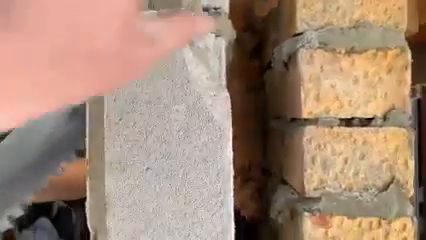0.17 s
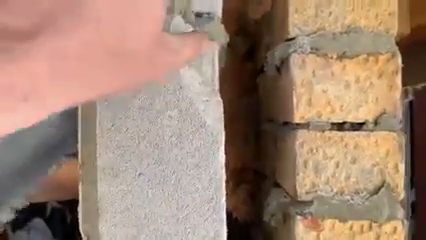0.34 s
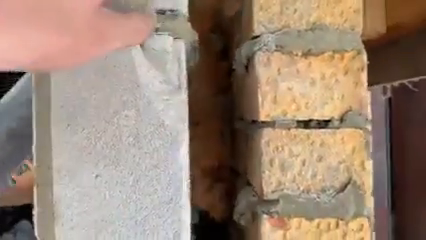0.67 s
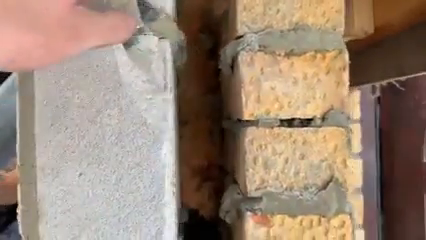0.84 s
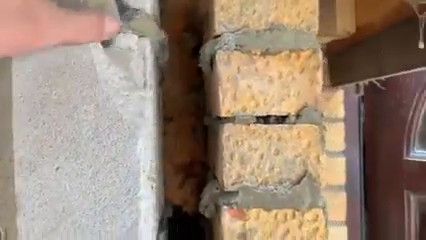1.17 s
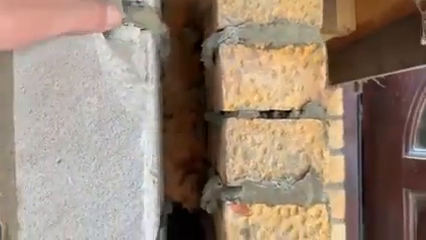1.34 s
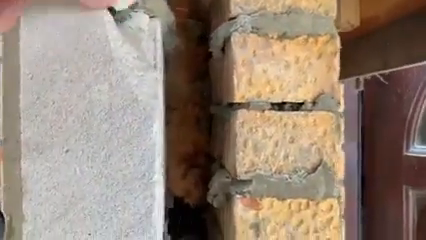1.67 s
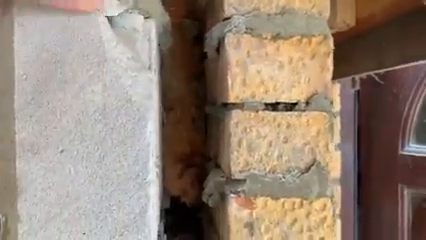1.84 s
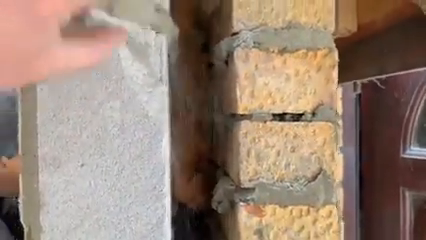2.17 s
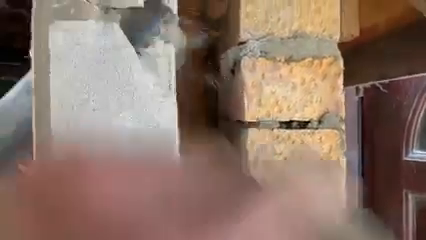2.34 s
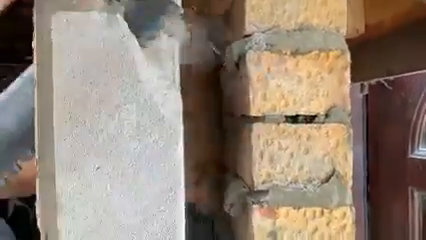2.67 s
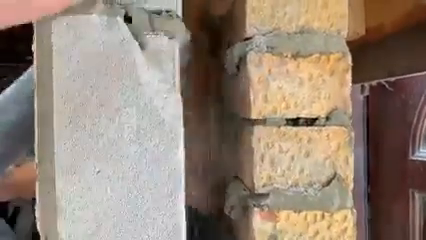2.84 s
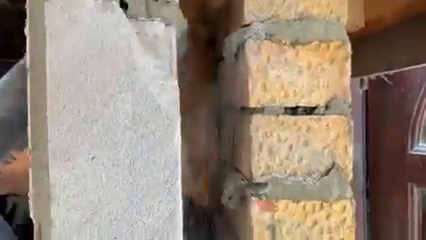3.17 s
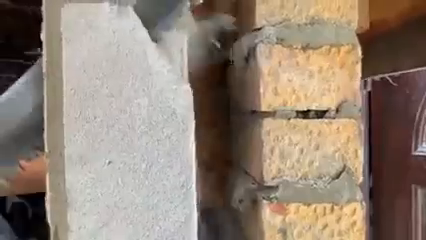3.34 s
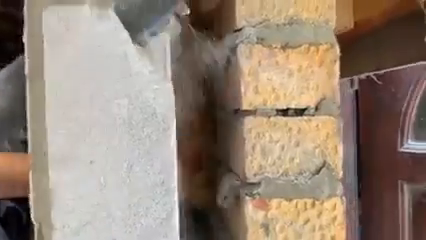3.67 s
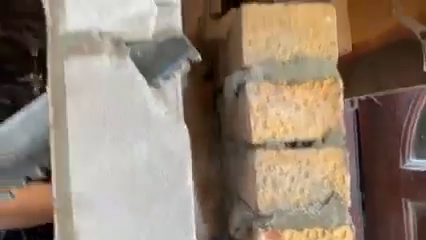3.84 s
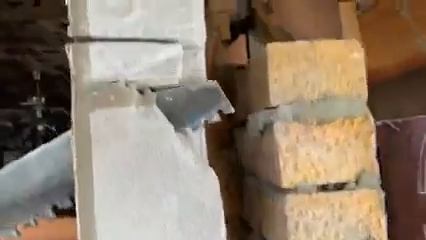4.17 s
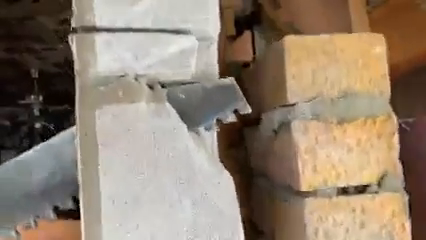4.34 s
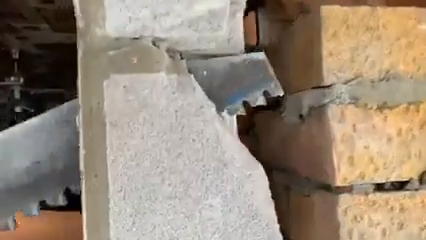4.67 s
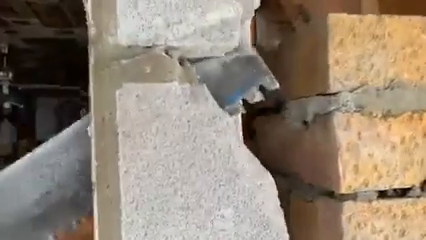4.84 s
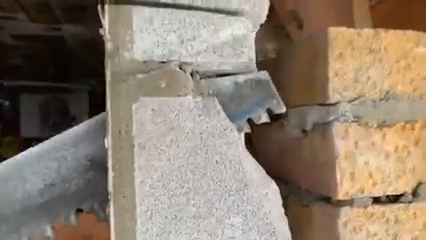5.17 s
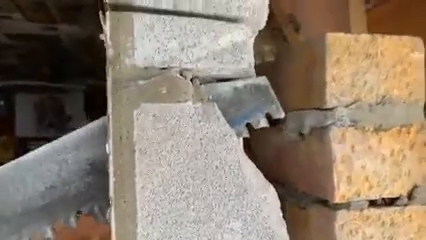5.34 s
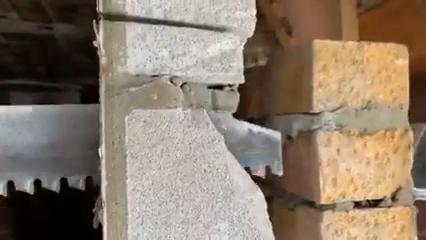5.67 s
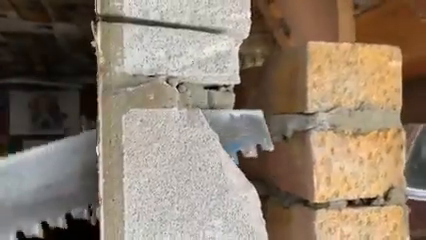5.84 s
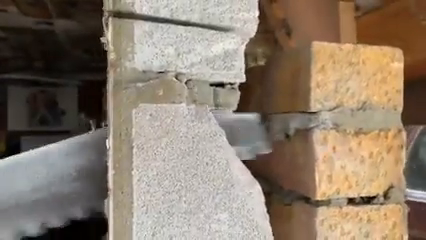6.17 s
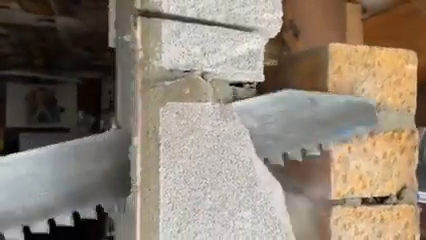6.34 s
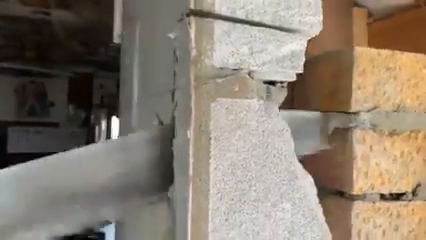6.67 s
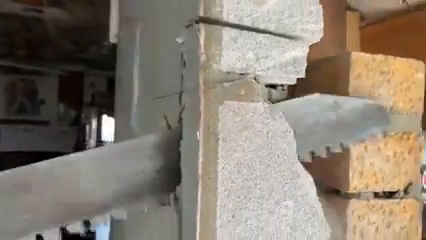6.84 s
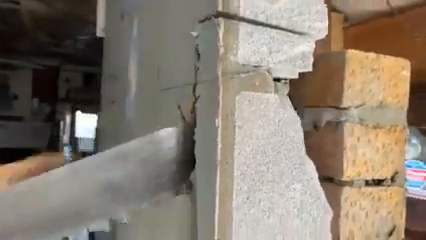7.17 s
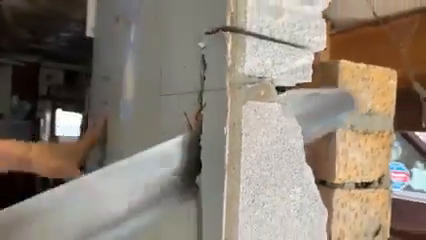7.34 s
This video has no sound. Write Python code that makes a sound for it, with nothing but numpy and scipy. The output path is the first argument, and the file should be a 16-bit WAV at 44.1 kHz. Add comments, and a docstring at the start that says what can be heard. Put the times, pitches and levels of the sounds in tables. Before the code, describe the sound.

Very close to the microphone, a coarse hand saw cuts an aerated concrete block: about a dozen brisk, gritty pushes, each ending in a low thud of the wall, with softer return scrapes between. The cutting nearly stops, with small scuffs and a snag, then longer rasping strokes resume with a singing blade. Crumbs tick, and a machine hums and whines steadily behind at a building site.

```python
"""A coarse hand saw rasps in an aerated concrete block, close by: quick pushes, each ending in a thud of the
wall, then the saw is eased round and longer strokes follow. Grit is clumped random grains, coloured and shaped
by each move. It feeds narrow resonances and the ringing steel; thin high tones flicker with the strokes. Thuds,
knocks and crumbs are decaying modes and noise bursts. Behind, a machine hums and whines at changing level: two
sines locked to one shaft, over filtered noise. A faint steady high whistle sounds throughout."""
import sys
import numpy as np
from scipy import signal
from scipy.fft import rfft, irfft
from scipy.io import wavfile
from scipy.ndimage import map_coordinates

SR = 44100
rng = np.random.default_rng(int(sys.argv[2]) if len(sys.argv) > 2 else 0)


def transcribe(signal):
    """Save signal, clipped to [-1, 1], as a 16-bit WAV file at the path in sys.argv[1]."""
    frames = np.atleast_2d(signal).T
    limited = np.clip(frames, -1, 1)
    pcm = np.round(limited * 32767).astype(np.int16)
    wavfile.write(sys.argv[1], SR, pcm)


N = 330750
TIME = np.arange(N) / SR
CUTOFF_HZ = 16000


def saw(rasp_db, crack_db, split_hz, bending_db):
    """Breaking grit sounds from the slot and sets the steel blade ringing; thin high tones follow the strokes."""
    # A tooth cracks a hard grain. Each row: time in seconds, relative level in dB.
    cracks = [(.223, -14), (.462, -10), (.487, -2.5), (.804, -4), (1.656, 3.5), (1.977, -8), (2.282, -1),
              (2.612, -7), (2.960, 0.5), (3.074, -12.5), (3.290, -14), (4.817, -15), (4.884, -13),
              (6.303, -13), (6.760, -0.5)]
    # A tooth tip ticks on the stone, thin and bright. Each row: time in seconds, relative level in dB.
    ticks = [(.078, -12), (.843, -29), (3.074, -13), (4.275, -22), (4.410, -20), (4.418, -14),
             (4.817, -18.5), (4.876, -32), (4.885, -30)]
    # Colour of the rasp. Each row: frequency in Hz, relative density in dB per Hz.
    rasp_spectrum = [(50, 10), (100, 14.5), (300, 5), (650, -2), (1100, 0), (1550, -6.5), (2050, 1),
                     (2600, 3.5), (3300, 2), (4300, 3), (5400, -3), (6500, 0), (8200, -0.5), (12000, -1.5),
                     (14000, -7), (16000, -15)]
    # Resonances and thin tones heard with the rasp. Each row: frequency in Hz, width in Hz, relative level in dB.
    resonances = [(2620, 260, -3.5), (2879, 25, -5), (3112, 25, -4), (8193, 10, 6), (8398, 12, 1),
                  (9964, 30, -1), (11869, 10, 5)]
    # Thin, very high steady tones that sound with the strokes. Each row: frequency in Hz, width in Hz,
    # relative level in dB.
    thin_tones = [(13609, 6, 20), (14642, 6, 21), (15676, 6, 27)]
    # How freely the resonances ring. Each row: time in seconds, gain in dB.
    ring_freedom = [(0, -2.5), (2.3, 3.5), (3.6, 3.5), (5.6, 6), (6.8, 3), (7.5, 4)]
    # Level of the thin high tones. Each row: time in seconds, gain in dB.
    thin_tone_levels = [(0, 0.5), (3.6, -10), (5, -7), (6.8, -21)]
    # One blade mode sings out. Each row: time in seconds, gain in dB.
    singing = [(0, 4.5), (1.2, 3.4), (2.1, 12), (2.7, 4.4), (3.3, 11), (3.9, 2), (6.1, 1.8), (6.5, 15),
               (6.8, 7.2), (7.0, 14), (7.19, 30), (7.27, 6.9), (7.5, 6)]
    sing_hz, sing_width_hz = 2386, 18

    force, bright_db = bite(drag_db=-6.0)
    broken = from_db(rasp_db) * grit(force, peak_grains_per_s=3600, size_db=2, dust=0.32,
                                     clump_rate_hz=220, clump_db=1.5, lump_db=1.4)
    broken += from_db(crack_db) * fade(blows(cracks), t60=0.015) * rng.standard_normal(N)
    rasp = shifting(colour(broken, rasp_spectrum), patchy_db=3.0, rate_hz=14)

    # fine grit hisses, coarse grit growls
    dull = signal.sosfiltfilt(signal.butter(2, split_hz, fs=SR, output="sos"), rasp)
    tilt = from_db(bright_db)
    rasp = (dull + tilt * (rasp - dull)) / np.sqrt((1 + tilt ** 2) / 2)
    rasp += fade(blows(ticks), t60=0.017) * above(rng.standard_normal(N), hz=9500)

    ringing = sum(from_db(db) * resonate(rasp, hz, width_hz) for hz, width_hz, db in resonances)
    ringing *= from_db(in_time(ring_freedom)[0])
    ringing += from_db(bending_db) * bending(rasp, reach_hz=126, width_hz=53, slide_rate_hz=11.7)
    ringing += from_db(in_time(singing)[0]) * resonate(rasp, sing_hz, sing_width_hz)
    thin = sum(from_db(db) * resonate(rasp, hz, width_hz) for hz, width_hz, db in thin_tones)
    ringing += from_db(in_time(thin_tone_levels)[0]) * thin

    reflected = moving_paths(above(rasp + ringing, hz=680), t60=0.05, sway_rate_hz=1.0, count=3)
    return ringing + wander(rasp + reflected, lag_s=.000018, rate_hz=2.7)


def bite(drag_db):
    """Cutting strength and brightness in dB: each move swells, holds and dies over a light drag."""
    # Light rubbing of the blade between bites. Each row: time in seconds, relative level in dB.
    drag = [(0, -29.5), (3.5, -38.5), (3.9, -41.5), (5.9, -38), (7.5, -34)]
    power = from_db(in_time(drag)[0] + drag_db) ** 2
    bright = np.zeros(N)
    for s, rise_s, hold_s, fall_s, db, bright_db in gestures():
        near = slice(max(int((s - 3 * rise_s) * SR), 0), int((s + hold_s + 3 * fall_s) * SR))
        dt = TIME[near] - s
        away = np.maximum(np.maximum(-dt / rise_s, (dt - hold_s) / fall_s), 0)
        swell = (from_db(db) * np.exp(-away ** 1.5)) ** 2
        power[near] += swell
        bright[near] += swell * bright_db
    return np.sqrt(power), bright / power  # brightness is weighted by power


def gestures():
    """Every cutting move as (start of hold s, rise s, hold s, fall s, relative dB, brightness dB)."""
    # Quick pushes. Each row: hardest bite in seconds, rise in seconds, hold in seconds, relative level in dB,
    # brightness in dB.
    pushes = [(0.202, 0.02, 0.017, -18, 1.5), (0.474, 0.014, 0.013, -19.5, 11),
              (0.798, 0.0048, 0.0043, -17, 6), (1.077, 0.036, 0.011, -19, 2),
              (1.357, 0.04, 0.013, -19.5, 9), (1.648, 0.0095, 0.014, -15.5, -5.5),
              (1.98, 0.006, 0.016, -22.5, -6), (2.275, 0.025, 0.0063, -18, 9),
              (2.607, 0.022, 0.022, -15.5, 5), (2.938, 0.041, 0.018, -18, 3.5),
              (3.276, 0.039, 0.02, -18.5, 1.5), (3.609, 0.05, 0.047, -22, -0.5)]
    # Even scrapes, short as the blade is pulled back or eased round, long in the last strokes.
    # Each row: start of hold in seconds, hold in seconds, relative level in dB, brightness in dB.
    scrapes = [(0.072, 0.026, -27.5, 8), (0.344, 0.027, -25.5, 6), (0.59, 0.064, -34, 30),
               (0.716, 0.02, -31, 2), (0.916, 0.013, -28.5, 5), (0.977, 0.022, -25.5, 1),
               (1.202, 0.042, -26, 7), (1.502, 0.11, -29, 8), (1.809, 0.069, -27, 4),
               (2.016, 0.04, -34, -4), (2.101, 0.11, -28, 4), (2.432, 0.1, -29, 2), (2.752, 0.055, -27, 8),
               (3.107, 0.067, -24.5, 7), (3.441, 0.056, -23.5, 5.5), (3.815, 0.05, -49, 2),
               (4.175, 0.0057, -35.5, 21), (4.399, 0.042, -33, 25), (4.663, 0.1, -37, 3),
               (5.498, 0.1, -32, -5), (5.546, 0.013, -32, -6), (5.7, 0.015, -33, -7),
               (6.023, 0.061, -31, -6), (6.191, 0.11, -28, 0), (6.417, 0.18, -26, 0),
               (6.514, 0.022, -26.5, -5), (6.704, 0.086, -24, 3), (6.751, 0.074, -19.5, -1),
               (6.957, 0.17, -25, 5), (7.233, 0.036, -24, 8), (7.288, 0.18, -17.5, 1.5)]
    # The teeth snag and tear free. Each row: time in seconds, relative level in dB, fall in seconds,
    # brightness in dB.
    snags = [(0.075, -30, 0.0087, 3), (.11, -23, 0.017, 19), (.218, -25, .01, -5), (.462, -24, 0.011, 6),
             (.632, -27, 0.014, 8), (.692, -21, 0.018, 4), (.773, -18.5, 0.0059, -3),
             (0.842, -29, 0.0085, 21), (1.272, -19, 0.01, 9), (1.621, -23, 0.0059, 6.5),
             (1.929, -18.5, 0.017, 5), (1.963, -15, 0.019, 5), (2.116, -21.5, 0.012, 7),
             (2.256, -28, .015, 2), (2.416, -22, 0.0055, 6), (2.46, -22.5, 0.043, 14),
             (2.833, -24.5, 0.016, 3), (2.896, -21.5, 0.039, -1.5), (2.992, -26, 0.012, 3),
             (3.075, -19, 0.011, 5), (3.233, -22.5, 0.018, 7), (3.458, -21, 0.021, -5),
             (4.276, -33, 0.038, 9), (4.788, -23, 0.021, -1), (4.816, -22.5, 0.0091, 1),
             (4.876, -20.5, 0.021, 1.5), (4.93, -33.5, 0.018, 7), (6.058, -29, 0.0089, -3),
             (6.296, -21.5, 0.015, -1)]
    push_stop_s = 0.016  # after its hardest bite a push stalls
    scrape_attack_s, scrape_release_s, snag_rise_s = 0.018, 0.025, .0035
    moves = [(s, rise_s, hold_s, push_stop_s, db, bright_db) for s, rise_s, hold_s, db, bright_db in pushes]
    moves += [(s, scrape_attack_s, hold_s, scrape_release_s, db, bright_db)
              for s, hold_s, db, bright_db in scrapes]
    moves += [(s, snag_rise_s, 0, fall_s, db, bright_db) for s, db, fall_s, bright_db in snags]
    return moves


def grit(force, peak_grains_per_s, size_db, dust, clump_rate_hz, clump_db, lump_db):
    """Grains break in clumps, each tooth at its own depth, more often in a hard bite, over a hiss of dust."""
    teeth_per_s, tooth_swing_db = 59, 0.5  # typical rate; each tooth digs in and slackens
    rate = peak_grains_per_s * np.sqrt(force / force.max())
    sizes = rms_one(from_db(size_db * np.minimum(rng.exponential(1, N), 4)))
    sizes = sizes * rng.choice([-1, 1], N)
    grains = sizes * (rng.random(N) < rate / SR) * np.sqrt(SR / rate)
    teeth = np.cumsum(teeth_per_s * from_db(drift(6))) / SR
    depth = rng.uniform(-1.23, 1, N)[teeth.astype(int)]
    clumps = from_db(clump_db * drift(clump_rate_hz) + lump_db * depth - tooth_swing_db * (teeth % 1))
    return force * rms_one((grains + dust * rng.standard_normal(N)) * clumps)


def bending(x, reach_hz, width_hz, slide_rate_hz, count=16):
    """Crowded bending modes trade energy; the contact favours those near one pitch, which moves with each stroke."""
    # Favoured pitch. Each row: time in seconds, frequency in Hz.
    bend_hz = [(0, 2460), (.49, 2610), (.7, 2600), (.81, 2550), (.98, 2670), (1.08, 2630), (1.27, 2800),
               (1.36, 2340), (1.6, 2470), (1.86, 2570), (2.12, 2430), (2.6, 2520), (2.93, 2430),
               (3.15, 2630), (3.3, 2400), (3.6, 2440), (6.3, 2530), (7.05, 2580), (7.5, 2680)]
    pitches_hz = np.linspace(2200, 3000, count) + 12 * rng.standard_normal(count)
    favoured_hz, = in_time(bend_hz)
    shares = np.array([drift(slide_rate_hz) / (1 + ((hz - favoured_hz) / reach_hz) ** 2) for hz in pitches_hz])
    shares /= np.sqrt(np.mean(shares ** 2, axis=0))
    return sum(resonate(x, hz, width_hz) * share for hz, share in zip(pitches_hz, shares))


def shifting(x, patchy_db, rate_hz, count=10):
    """The colour keeps changing: each band swells and sinks on its own."""
    out, rest = 0, x
    for hz in np.geomspace(1800, 12000, count):
        part = signal.sosfiltfilt(signal.butter(6, hz, fs=SR, output="sos"), rest)
        out = out + part * from_db(patchy_db * drift(rate_hz))
        rest = rest - part
    return out + rest


def moving_paths(x, t60, sway_rate_hz, count=5):
    """Short random reflections, different in each channel, trade shares over time."""
    t = TIME[:SR // 8]
    paths = rng.standard_normal((count, 2, len(t))) * from_db(-60 * t / t60) * (t > .001)
    paths /= np.sqrt(np.sum(paths ** 2, axis=2, keepdims=True))
    shares = np.array([drift(sway_rate_hz) for _ in range(count)])
    shares /= np.sqrt(np.sum(shares ** 2, axis=0))
    return sum(share * signal.oaconvolve(x[None], path, axes=1)[:, :N] for share, path in zip(shares, paths))


def wander(x, lag_s, rate_hz):
    """The sounding part of the blade moves about, so its arrival in the right channel shifts."""
    moved = np.arange(N) + lag_s * SR * drift(rate_hz)
    return np.array([x[0], map_coordinates(x[1], [moved], order=3, mode="nearest")])


def block(knock_db):
    """The blade knocks the light block, whose modes die at once."""
    # Dull knocks. Each row: time in seconds, relative level in dB.
    knocks = [(.222, -22), (.487, -13.5), (.812, -13), (1.085, -6.5), (1.655, -19), (2.284, -7),
              (2.890, -7), (3.303, -8), (6.302, -12.5)]
    # Modes of the block. Each row: frequency in Hz, relative level in dB, t60 in seconds.
    block_modes = [(520, -14, 0.021), (770, -1, 0.028), (1025, -12, 0.015), (1285, -6, 0.042),
                   (1796, -3, 0.03), (2090, -21, 0.017)]
    touches = fade(blows(knocks), t60=.012) * rng.standard_normal(N) / np.sqrt(SR / 1000)
    return sum(from_db(db + knock_db) * ring(touches, hz, t60) for hz, db, t60 in block_modes)


def wall(thud_db, rumble_db, rattle_db, spread_db):
    """The wall trembles under each push, the stalling blade's judder rings its modes and the block rocks back."""
    # A stalling push jolts the wall. Each row: time in seconds, relative thud in dB, relative deep sway in dB,
    # hardness in dB (added to all modes but the first two).
    jolts = [(.002, -34, -23.5, 0), (0.217, -19, -22, 2), (0.497, -18, -27, 1.5), (0.821, -18, -16.5, 5.5),
             (1.099, -15, -20, -2), (1.382, -16.5, -20, 2.5), (1.675, -16.5, -17, 3),
             (1.98, -22.5, -17, -1), (2.296, -14.5, -20, -9), (2.636, -20.5, -19, -1),
             (2.972, -19, -18.5, -1), (3.311, -15, -17.5, 1), (3.654, -27, -36, 7)]
    # The block shifts in its bed as the saw is turned or drags. Each row: time in seconds, relative level in dB.
    shifts = [(4.795, -18), (4.819, -23), (7.05, -24), (7.335, -29), (7.39, -28)]
    # The block rocks back on its bed. Each row: time in seconds, relative level in dB.
    rattles = [(.002, -22.5), (.225, -26), (.26, -21), (.815, -25), (.848, -23), (1.10, -27), (1.12, -28.5),
               (1.405, -22), (1.668, -25), (1.697, -20.5), (2.30, -29), (2.655, -36), (2.995, -32.5),
               (3.30, -26.5), (3.335, -25.5), (4.8, -32.5)]
    # Modes of the wall. Each row: frequency in Hz, relative level in dB, t60 in seconds.
    wall_modes = [(80, -1, 0.19), (115, -18, 0.17), (144, -1, 0.34), (159.2, -7, 0.13), (229, -12, 0.21),
                  (287, -21, 0.34), (346, -23, 0.1), (400, -20, 0.064), (456, -12, 0.073)]
    slip_s, slip_loss_db, slips = 0.0118, 2.5, 3  # mean spacing and loss from slip to slip
    lead_s, tail_s = 0.042, 0.043  # the tremble grows and dies by a factor e in these times

    s, jolt_db, sway_db, hard_db = np.transpose(jolts)
    sway = ring(blows(np.transpose([s, sway_db])), hz=50.1, t60=0.61)
    low = ring(blows(shifts), hz=91, t60=0.17) + from_db(-7) * ring(blows(shifts), hz=169, t60=0.13)

    slip_times_s = s[:, None] + slip_s * np.arange(slips) + rng.normal(0, .0005, (len(s), slips))
    for k, (hz, db, t60) in enumerate(wall_modes):
        slip_db = (jolt_db + hard_db * (k > 1))[:, None] - slip_loss_db * np.arange(slips)
        slip_db = slip_db + rng.normal(0, 1, slip_times_s.shape)
        judder = blows(np.transpose([slip_times_s.ravel(), slip_db.ravel()]))
        low = low + (-1) ** k * from_db(db + thud_db) * ring(judder, hz, t60)

    load = np.zeros(N)
    for at, db in zip(s, jolt_db):
        away = np.maximum((at - TIME) / lead_s, (TIME - at) / tail_s)
        load += from_db(db) * np.exp(-np.minimum(away, 20))
    low += from_db(rumble_db) * load * rms_one(band(rng.standard_normal(N), low_hz=63.6, high_hz=179))
    rattle = rms_one(band(rng.standard_normal(N), low_hz=158, high_hz=327))
    low += from_db(rattle_db) * fade(blows(rattles), t60=0.077) * rattle
    spread = from_db(spread_db) * moving_paths(low, t60=0.013, sway_rate_hz=1.96, count=2)
    return low + sway * from_db([[-1.3], [1.3]]) + spread


def crumbs(crumb_db, crumbs_per_s, size_db, t60, count=8):
    """Loose crumbs trickle in little runs and tick on the stone: short noise bursts through resonances."""
    falls = rng.random(N) < crumbs_per_s * from_db(5 * drift(5)) / SR
    sizes = falls * from_db(crumb_db + size_db * np.minimum(rng.exponential(1, N), 3))
    dealt, dust = rng.integers(0, count, N), rng.standard_normal(N)
    ticking = np.zeros(N)
    for k, hz in enumerate(np.geomspace(2300, 9000, count)):
        ticking += resonate(fade(sizes * (dealt == k), t60) * dust, hz, hz / 4)
    return np.array([ticking, ticking])


def machine(rush_db, diffuse_hz, diffuse_db, waver_db, whistle_db):
    """A motor hums at its shaft rate; its fan whines at the blade rate over rushing air. Apart from these, a
    faint steady high whistle sounds throughout."""
    # The two tones. Each row: time in seconds, relative hum in dB, relative whine in dB,
    # lean of the hum to the left in dB.
    tone_levels = [(0, -38.5, -51.5, -1), (2.3, -36.5, -37.5, -2), (3.0, -39, -41.5, -1),
                   (3.85, -35, -36, -4), (4.02, -34, -52, -3), (4.25, -39, -39.5, -5), (4.8, -39, -37, -3),
                   (5.03, -37, -36.5, 1), (5.35, -46, -36.5, -9), (5.8, -39.5, -41, -3),
                   (6.2, -36.5, -37, 4), (6.72, -41, -57, -10), (6.9, -41, -33, 0), (7.5, -38, -40, 0)]
    # Rush of the machine and the site. Each row: frequency in Hz, relative density in dB per Hz.
    rush_spectrum = [(30, 14), (60, -18), (92, 8), (130, 2), (220, 0), (350, 7), (480, -5), (610, 1),
                     (720, -9), (860, -6), (1100, -11), (1500, -10.5), (2100, -19.5), (2450, -20.5),
                     (3000, -19), (3900, -8.5), (4400, -11.5), (4800, -14.5), (6200, -16), (7200, -28),
                     (8400, -11.5), (9600, -23), (15000, -27)]
    # Level of the rush. Each row: time in seconds, relative level in dB.
    rush_levels = [(0, -36.5), (3, -38), (4.1, -37), (4.9, -35.5), (5.9, -34), (7.5, -31)]
    shaft_hz, fan_blades, whistle_hz = 612.8, 7, 8192

    hum_db, whine_db, lean_db = in_time(tone_levels)
    turn = 2 * np.pi * np.cumsum(shaft_hz * (1 + .0002 * drift(6))) / SR
    hum_db = hum_db - .4 + 2.2 * drift(12) + lean_db * np.array([[.5], [-.5]])
    whine_db = whine_db + 1.2 * np.array([drift(8), drift(8)]) + [[-.6], [.6]]
    tones = from_db(hum_db) * np.sin(turn) + from_db(whine_db) * np.sin(fan_blades * turn)
    tones += from_db(whistle_db + drift(4)) * np.sin(2 * np.pi * whistle_hz * TIME)

    # long waves are alike in both channels, short ones bounce in from all sides
    rush = shifting(rng.standard_normal(N), patchy_db=1.5, rate_hz=5.1, count=6)
    diffuse = moving_paths(above(rush, diffuse_hz), t60=0.024, sway_rate_hz=0.29, count=2)
    air = colour(rush + from_db(diffuse_db) * diffuse, rush_spectrum)
    return tones + from_db(in_time(rush_levels)[0] + rush_db + waver_db * drift(4.3)) * air


def from_db(db):
    """Decibels to gain."""
    return 10 ** (np.asarray(db) / 20)


def rms_one(x):
    """Scale to unit power."""
    return x / np.sqrt(np.mean(x ** 2) + 1e-20)


def in_time(rows):
    """The columns of a curve, sample by sample."""
    s, *columns = np.transpose(rows)
    return [np.interp(TIME, s, c) for c in columns]


def drift(rate_hz):
    """Smooth random curve of unit power: low-passed noise made at an eighth of the sample rate."""
    r = np.exp(-16 * np.pi * rate_hz / SR)
    noise = rng.standard_normal(N // 8 + 8002)
    slow = signal.lfilter([1], [1, -2 * r, r * r], noise)[8000:]  # drop the settling
    return np.interp(np.arange(N) / 8, np.arange(len(slow)), rms_one(slow))


def colour(x, spectrum):
    """Filter by a smooth spectrum, keeping the power of white noise."""
    hz, db = np.transpose(spectrum)
    bins_hz = np.maximum(np.fft.rfftfreq(2 * N, 1 / SR), 1)
    gain = from_db(np.interp(np.log(bins_hz), np.log(hz), db))
    gain = gain * (bins_hz < CUTOFF_HZ) / (1 + (40 / bins_hz) ** 4)
    return irfft(rfft(x, 2 * N) * rms_one(gain))[..., :N]


def resonate(x, hz, width_hz):
    """A resonance with gain 1 at its top."""
    r = np.exp(-np.pi * width_hz / SR)
    zeros = np.array([1, 0, -1]) * (1 - r * r) / 2
    return signal.lfilter(zeros, [1, -2 * r * np.cos(2 * np.pi * hz / SR), r * r], x)


def ring(clicks, hz, t60):
    """A unit click sets a decaying sine of height 1 ringing."""
    r, w = from_db(-60 / (t60 * SR)), 2 * np.pi * hz / SR
    return signal.lfilter([0, np.sin(w)], [1, -2 * r * np.cos(w), r * r], clicks + 1e-18)


def blows(rows):
    """One click for each (s, dB) row."""
    s, db = np.transpose(rows)
    return np.bincount(np.clip(s * SR, 0, N - 1).astype(int), from_db(db), N)


def fade(clicks, t60):
    """An envelope that jumps at each click and dies away."""
    return signal.lfilter([1], [1, -from_db(-60 / (t60 * SR))], clicks + 1e-18)


def above(x, hz):
    """Second-order high-pass."""
    return signal.sosfilt(signal.butter(2, hz, "high", fs=SR, output="sos"), x)


def band(x, low_hz, high_hz):
    """Band-pass with second-order skirts."""
    return signal.sosfilt(signal.butter(2, [low_hz, high_hz], "band", fs=SR, output="sos"), x)


def scene():
    """Saw, block, wall and crumbs close by, the machine behind them."""
    cutting = saw(rasp_db=-5.5, crack_db=-12.5, split_hz=2730, bending_db=0.5) + block(knock_db=-6)
    cutting = cutting * from_db([[-.4], [.4]])
    cutting += crumbs(crumb_db=-32.5, crumbs_per_s=35, size_db=3, t60=0.023)
    thuds = wall(thud_db=-3.0, rumble_db=-8, rattle_db=3.5, spread_db=-7) * from_db([[-.5], [.5]])
    site = machine(rush_db=1.7, diffuse_hz=570, diffuse_db=-2, waver_db=0.85, whistle_db=-53.5)
    return cutting + thuds + site * from_db([[-.4], [.4]])


def record(dry):
    """The right channel lags in phase; the deepest bass is thinned and the top is cut steeply."""
    # Phase by which the left channel leads the right, the same for every sound.
    # Each row: frequency in Hz, phase in radians.
    channel_phase = [(0, 0), (350, .3), (610, 1), (1100, 1.5), (1600, 3.1), (2350, 6.3), (3200, 9.4),
                     (4350, 12.6), (5300, 14.5), (6300, 14.3), (7300, 15.7), (8100, 12.8), (8700, 13.7),
                     (9950, 18.8), (11900, 25.1), (13000, 26.9), (13600, 25.5), (14500, 27.8),
                     (16000, 28.3)]
    phase = np.interp(np.fft.rfftfreq(2 * N, 1 / SR), *np.transpose(channel_phase))
    right = irfft(rfft(dry[1], 2 * N) * np.exp(-1j * phase))[:N]
    channels = np.array([dry[0], right])
    thinned = signal.sosfilt(signal.butter(3, 40, "high", fs=SR, output="sos"), channels)
    return signal.sosfilt(signal.ellip(10, .2, 80, CUTOFF_HZ, fs=SR, output="sos"), thinned)


dry = scene()
out = record(dry)
transcribe(out)
```